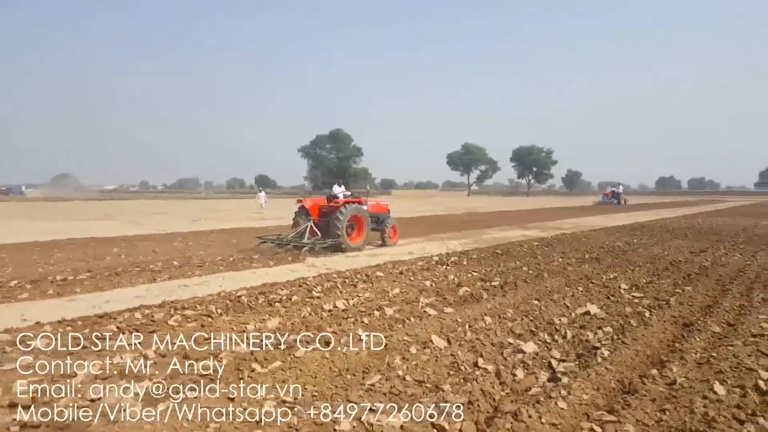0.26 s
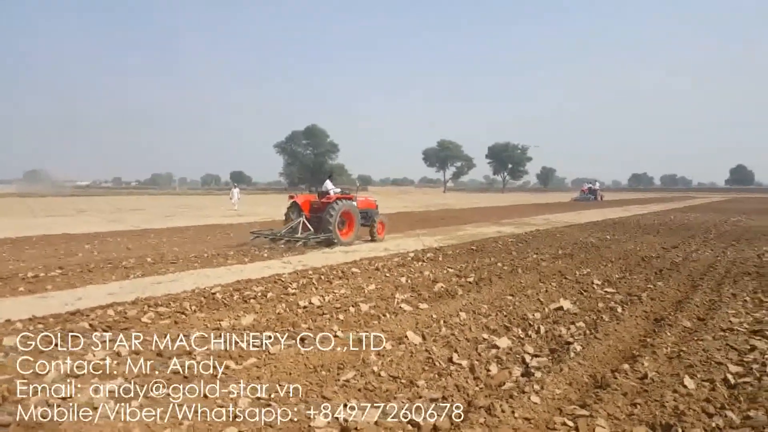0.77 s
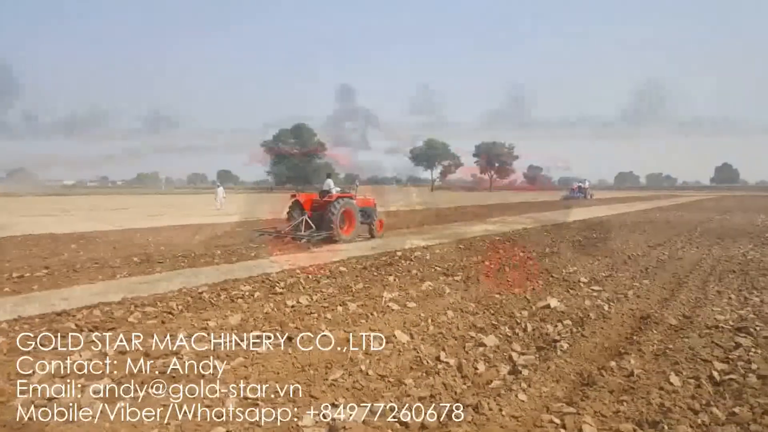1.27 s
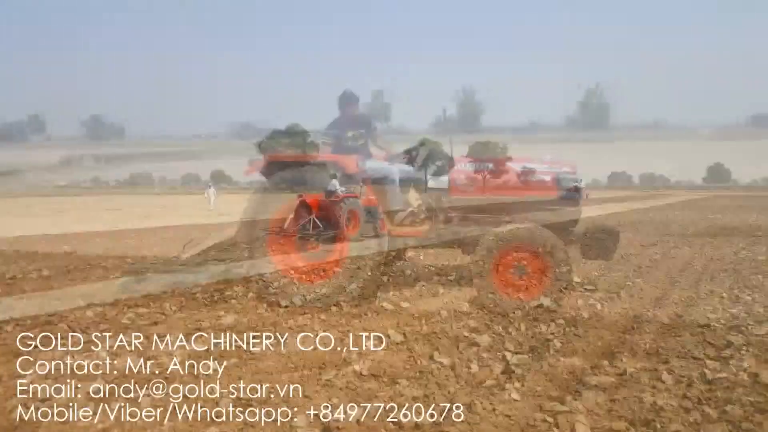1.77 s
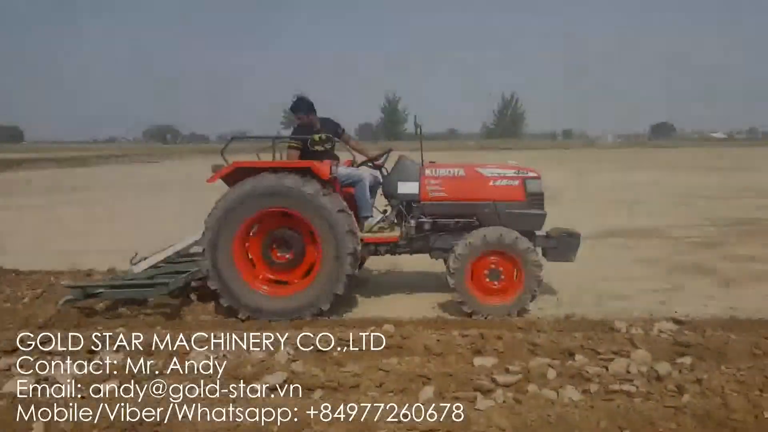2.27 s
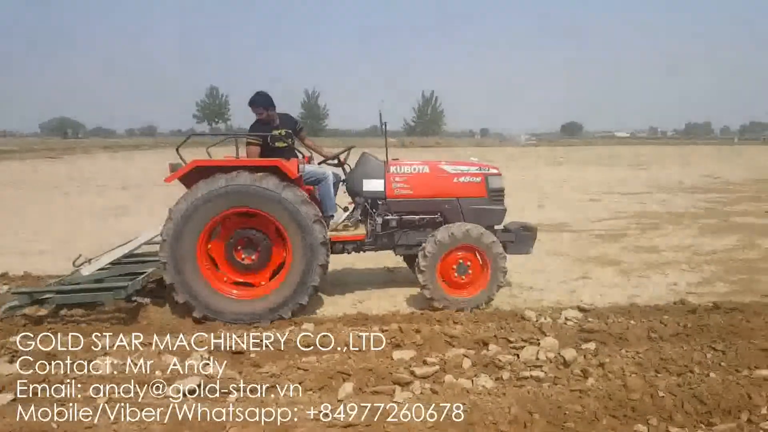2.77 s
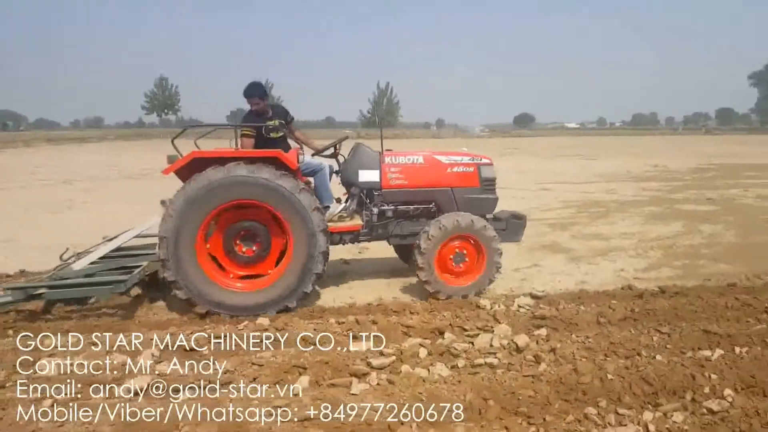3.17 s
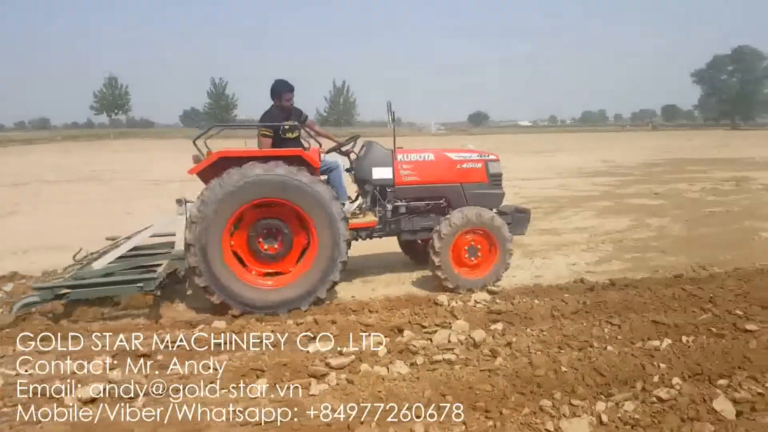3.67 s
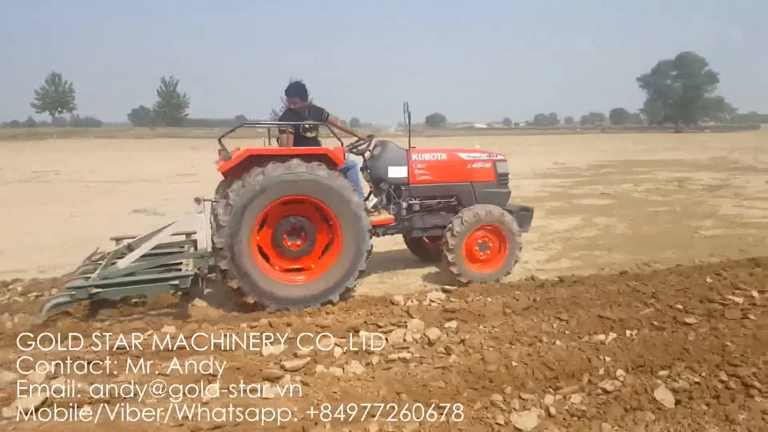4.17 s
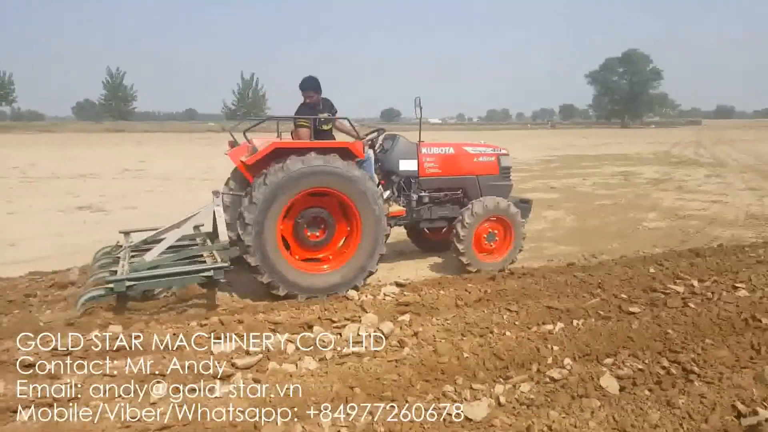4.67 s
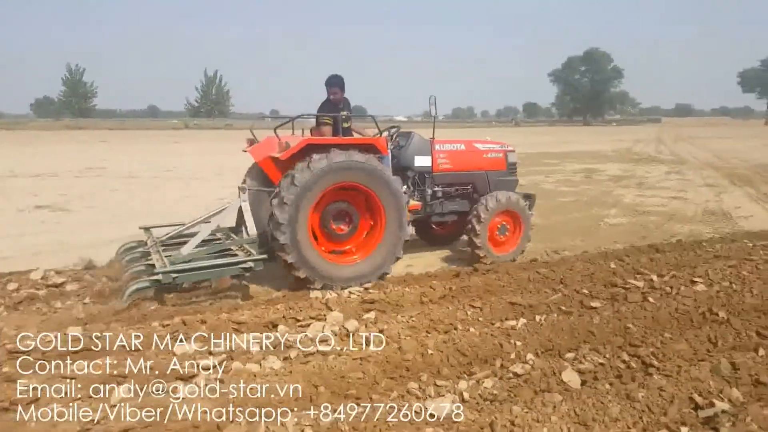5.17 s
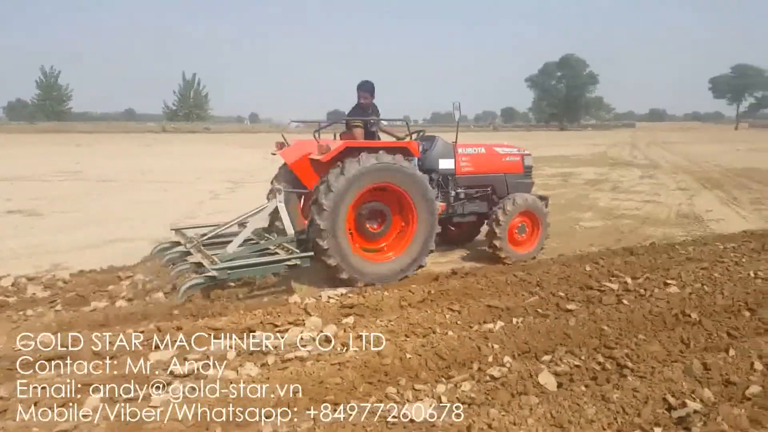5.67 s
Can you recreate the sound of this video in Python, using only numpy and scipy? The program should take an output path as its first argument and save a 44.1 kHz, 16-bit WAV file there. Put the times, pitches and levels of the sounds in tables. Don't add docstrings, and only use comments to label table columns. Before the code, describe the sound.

From 0 to about 0.95 s a four-cylinder tractor diesel is heard across an open field: a quiet, dull, steady drone near 67 firings a second, with faint gear whine and soft clatter. At 0.96 s a close view of the machine cuts in abruptly, far louder, near 61 to 62 firings a second. Both overlap and beat until the far one ends at about 1.95 s. The close engine has a deep buzzing exhaust, uneven chug, rattling panels, sharp knock and bright valve hiss. Gear whines around 600 to 2700 Hz flutter and swell in spells. Steel tines squeak on stones near 4.7 kHz: a tiny chirp at 1.05, a longer skid at 1.2, short ones at 1.5 and 2.55. The engine labours, lowest near 3.1 s with a stronger bark, then recovers by 4 s. As it turns tail-on, upper exhaust tones fade and it continues slightly softer to about 5.9 s. Mono, no high treble.

```python
import sys
import numpy as np
from scipy import signal
from scipy.fft import rfft, irfft, next_fast_len
from scipy.io import wavfile
from scipy.ndimage import uniform_filter1d, map_coordinates

SR = 44100
rng = np.random.default_rng(int(sys.argv[2]) if len(sys.argv) > 2 else 0)


def log_audio(samples):
    frames = np.atleast_2d(samples).T
    limited = np.clip(frames, -1, 1)
    pcm = np.round(limited * 32767).astype(np.int16)
    wavfile.write(sys.argv[1], SR, pcm)


def gain_from_decibels(decibels):
    exponent = np.asarray(decibels, float) / 20
    return 10 ** exponent


N = 261072
T = np.arange(N) / SR
CUT_IN_S, FAR_ENDS_S = .956, 1.955


def unit(x):
    return x / np.sqrt(np.mean(x ** 2) + 1e-20)


def curves(rows):
    s, *cols = np.transpose(rows)
    return [np.interp(T, s, c) for c in cols]


def wobble(rate):
    return map_coordinates(rng.standard_normal(int(N * rate / SR) + 4), [T * rate])


def coloured(x, spectrum):
    m = next_fast_len(N + 8192)
    hz, db = np.transpose(spectrum)
    log_hz = np.log(np.fft.rfftfreq(m, 1 / SR) + 1)
    gain = gain_from_decibels(np.interp(log_hz, np.log(hz), db))
    return unit(irfft(rfft(x, m) * gain, m)[:N])


def patchy(depth_db):
    z = signal.stft(rng.standard_normal(N), nperseg=512)[2]
    field = uniform_filter1d(rng.standard_normal(z.shape), size=5, axis=0)
    field = uniform_filter1d(field, size=10, axis=1)
    return signal.istft(z * gain_from_decibels(depth_db * unit(field)), nperseg=512)[1][:N]


def firings(rate_hz, start_s):
    return np.cumsum(rate_hz * (T >= start_s)) / SR


def exhaust(cycle, orders, levels_db, crank, spread):
    start, lag = crank
    total = 0
    for k, db in zip(orders, levels_db):
        turns = k * (cycle + start) + (k - 1) * (lag + spread * (k - 2))
        total = total + np.sqrt(2) * gain_from_decibels(db) * np.cos(2 * np.pi * turns)
    return total


def chug(cycle, pipe, air):
    at = np.flatnonzero(np.diff(np.floor(cycle)))
    puffs = np.zeros(N)
    puffs[at] = rng.standard_normal(len(at))
    return unit(coloured(puffs, pipe) + air * coloured(rng.standard_normal(N), pipe))


def whine(cycle, order, level_db, flutter_db, slack):
    shake = rng.uniform(0, 2 * np.pi) + slack * np.sqrt(order) * wobble(22)
    level = np.sqrt(2) * gain_from_decibels(level_db + flutter_db * wobble(14))
    return level * np.sin(2 * np.pi * order * cycle + shake)


CYLINDER_STRENGTH = (0.62, 0.59, 0.92, 0.54)


def knocking(cycle, rise, fall, scatter_db):
    count = np.floor(cycle).astype(int)
    since = cycle - count
    chance = gain_from_decibels(scatter_db * rng.standard_normal(count.max() + 1))
    strength = np.array(CYLINDER_STRENGTH)[count % len(CYLINDER_STRENGTH)] * chance[count]
    return strength * (1 - np.exp(-(since / rise) ** 2)) * np.exp(-since / fall)


# multiple of the firing rate, level in dB.
FAR_GEAR_LINES = [(1.45, -40.5), (3, -40.5), (6.07, -42.5), (9.82, -41), (11.38, -43), (12.1, -47),
                  (14.83, -41), (17.04, -49), (19.03, -47), (23.29, -43), (29.6, -42), (31.04, -44.5),
                  (33.04, -52), (37.03, -53), (39.2, -52), (44.45, -43.5), (46.56, -48.5), (54.3, -52),
                  (88.5, -64), (116.5, -66), (132, -70)]


def far_gears(cycle):
    return sum(whine(cycle, order, db, flutter_db=2.0, slack=0.075) for order, db in FAR_GEAR_LINES)


# frequency in Hz, gain in dB.
FIELD_COLOUR = [(150, -42), (260, -12.5), (512, -1), (597, -14.5), (664, -5.5), (1250, -7), (1410, -11.5),
                (1570, -5.5), (1780, -14), (2010, -10.5), (3050, -13), (4910, -27), (7100, -30),
                (9080, -42.5), (10300, -60.5), (13400, -89.5), (22000, -120)]


def far_clatter(cycle):
    rattle = patchy(1.05) * (5.5 + .7 * knocking(cycle, rise=0.093, fall=.3, scatter_db=7.0))
    return coloured(rattle, FIELD_COLOUR)


# time in seconds, rate in Hz.
FAR_RATE = [(0, 67.01), (.24, 67.44), (.6, 67.46), (.84, 66.88), (1.08, 67.5), (1.4, 67.1), (1.56, 66.76),
            (1.7, 66.95), (1.96, 66.9)]
# time in seconds, level in dB.
FAR_NEARNESS = [(0, 0.1), (.28, 0), (.6, 0), (.8, 0), (.96, -0.2), (1.5, -0.5)]
# frequency in Hz, gain in dB.
FAR_PIPE_COLOUR = [(15, -14), (50, -20), (100, 2.5), (150, -5.5), (210, -7), (270, -16), (400, -28),
                   (800, -67)]


def far_pass():
    (rate_hz,), (near_db,) = curves(FAR_RATE), curves(FAR_NEARNESS)
    cycle = firings(rate_hz, 0)
    sound = exhaust(cycle, (1, 2), (near_db - 25, near_db - 27), crank=(-.05, .3), spread=0)
    sound = sound + far_gears(cycle)
    sound += gain_from_decibels(near_db - 32.5 + 4.94) * far_clatter(cycle)
    sound += gain_from_decibels(near_db - 31) * chug(cycle, FAR_PIPE_COLOUR, air=1.8)
    return sound * np.clip((FAR_ENDS_S - T) / 0.0043, 0, 1)


# centre in seconds, half length in seconds, pitch in Hz, level in dB.
TINE_SQUEAKS = [
    (1.047, 0.021, 4720, -48),
    (1.18, 0.073, 4650, -34),
    (1.52, .03, 4930, -39),
    (2.546, .03, 4700, -43.5),
]


def tines():
    total = 0
    for s, half, hz, db in TINE_SQUEAKS:
        level = gain_from_decibels(db + 2.8 * wobble(90)) * np.exp(-((T - s) / half) ** 2)
        total = total + level * np.sin(2 * np.pi * hz * T + 1.3 * wobble(160))
    return total


# frequency in Hz, gain in dB.
HISS_COLOUR = [(2120, -23), (3600, -2.5), (3910, -5), (4720, -2), (5750, -10), (7540, -12), (8400, -19.5),
               (9310, -25), (9900, -33.5), (10300, -42), (10600, -58.5), (22000, -120)]


def valve_hiss(cycle, jolts):
    valves = 1 + .55 * knocking(cycle + .11, rise=.06, fall=.45, scatter_db=3.5)
    return coloured(patchy(0.62) * valves * gain_from_decibels(0.52 * jolts), HISS_COLOUR)


# frequency in Hz, gain in dB.
SIDE_COLOUR = [(150, -20), (260, -5.5), (292, -8), (424, -13.5), (548, -3.5), (601, -6), (683, -6.5),
               (750, -2.5), (1100, -13.5), (1410, -3), (1670, -12.5), (1860, -5.5), (2110, -12),
               (3070, -17), (4200, -26), (5460, -55), (9240, -120)]
# frequency in Hz, gain in dB.
REAR_COLOUR = [(150, -23), (260, 1), (523, -9), (645, -2), (852, -3.5), (914, -3.5), (1060, -16),
               (1410, -5.5), (1710, -11.5), (1880, -8.5), (2110, -17), (2290, -8.5), (2610, -17),
               (3100, -14.5), (4200, -22), (5460, -50), (9240, -120)]


def panel_clatter(behind, jolts):
    block = patchy(1.0) * gain_from_decibels(0.25 * jolts)
    return unit((1 - behind) * coloured(block, SIDE_COLOUR) + behind * coloured(block, REAR_COLOUR))


# frequency in Hz, gain in dB.
KNOCK_COLOUR = [(500, -40.5), (1000, -10.5), (1500, 3), (2200, -8.5), (3500, -7), (5000, -23),
                (8000, -22.5), (10500, -49)]


def combustion_knock(cycle):
    bursts = knocking(cycle + .1, rise=.1, fall=.35, scatter_db=1.5)
    return coloured(rng.standard_normal(N) * bursts, KNOCK_COLOUR)


def singing(rest_db, spells):
    level = gain_from_decibels(rest_db)
    edges = np.array([-1, 1, -1, 1]) * .07
    for s, length, db in spells:
        shape = np.interp(T, s + edges + [0, 0, length, length], [0, 1, 1, 0])
        level = level + max(gain_from_decibels(db) - gain_from_decibels(rest_db), 0) * shape
    return 20 * np.log10(level)


# multiple of the firing rate, resting level in dB.
PUMP_MESHES = [(14.77, -44.5), (22.17, -38), (36.93, -48.5), (44.3, -41.5)]
GEARBOX_MESHES = [(9.77, -48.5), (12.01, -49), (29.45, -41.5)]
AXLE_MESHES = [(23.22, -42), (30.93, -46)]
UPPER_MESHES = [(38.96, -52), (48.85, -48.5), (58.7, -57), (60.7, -54), (6.06, -44)]
# start in seconds, length in seconds, level in dB.
PUMP_SPELLS = [
    [(.9, 0.34, -29.5), (1.3, 0.36, -28.5), (1.9, .8, -33), (2.7, 0.23, -28), (2.9, 0.14, -34),
     (3.3, 1.6, -30.5), (4.9, .4, -36), (5.3, 0.38, -28), (5.83, .2, -27)],
    [(.9, 0.45, -23.5), (1.3, 0.42, -30), (1.9, 0.35, -25.5), (2.3, 0.08, -23.5), (2.5, 0.22, -25.5),
     (2.9, 0.15, -26.5), (3.3, 0.42, -29), (3.9, 0.74, -28), (4.7, 0.32, -33)],
    [(1.1, 0.22, -35), (1.9, 0.18, -39), (3.9, 0.19, -33), (4.3, 0.55, -37), (5.3, 0.17, -33)],
    [(1.4, 0.85, -41), (2.9, 0.22, -37.5), (4.5, 0.36, -37), (5.3, .2, -37)],
]
GEARBOX_SPELLS = [
    [(.9, 0.57, -31), (1.5, 0.42, -28.5), (1.9, .3, -36), (2.58, 0.554, -25), (3.1, 0.41, -26.5),
     (3.5, 0.21, -22.5), (3.7, 0.24, -27.5), (4.9, .4, -36.5), (5.7, .3, -34.5)],
    [(1.1, 0.37, -33), (1.5, 0.37, -28), (2.1, 0.58, -30.5), (3.3, .2, -30.5), (3.6, 0.38, -32),
     (4.3, .2, -39), (5.5, .2, -38)],
    [(1.7, 0.22, -34), (2.2, 1.3, -32), (3.7, 0.17, -40), (5.4, 0.34, -34)],
]
AXLE_SPELLS = [
    [(1, .3, -31), (1.6, 0.29, -29.5), (1.9, 0.18, -26.5), (2.1, 0.51, -29), (3.15, 0.44, -32.5),
     (3.7, 0.13, -28), (3.9, 0.54, -32.5), (4.5, 0.52, -36.5), (5.5, .2, -32)],
    [(1.1, 0.18, -30), (1.55, 1.4, -34.5), (3.5, 0.19, -29), (3.7, 0.24, -31.5), (4.52, 0.41, -31.5),
     (4.9, 0.27, -28), (5.72, .3, -32.5)],
]
UPPER_SPELLS = [
    [(.9, 1.3, -39), (2.2, 1.4, -37)],
    [(.9, 0.73, -39), (1.9, 0.48, -39), (3.3, 0.9, -40.5)],
    [(.9, .6, -42), (1.9, .5, -37.5), (2.4, 1.4, -43)],
    [(2, .7, -45), (2.75, .5, -42.5)],
    [(1.1, 1.45, -37), (3.3, 0.52, -37), (4.4, .65, -33), (5.1, 0.29, -33), (5.55, .45, -37)],
]
# multiple of the firing rate, level in dB.
CRANK_LINES = [(1.25, -36.5), (1.5, -38), (3.49, -39), (2.747, -33.5), (4.79, -39.5), (7.97, -46),
               (12.08, -35.5), (15.47, -40.5), (19.42, -47), (24.13, -37), (39, -49.5)]
# multiple of the firing rate, level in dB.
TAIL_LINES = [(4.25, -35), (5, -34), (7, -37.5), (7.74, -39), (10.24, -37.5)]


def near_gears(cycle, behind):
    total = 0
    trains = ((PUMP_MESHES, PUMP_SPELLS, 1.1, .03), (GEARBOX_MESHES, GEARBOX_SPELLS, 1.1, .03),
              (AXLE_MESHES, AXLE_SPELLS, 1.1, .03), (UPPER_MESHES, UPPER_SPELLS, 1.0, .027))
    for meshes, rows, flutter_db, slack in trains:
        for (order, rest_db), spells in zip(meshes, rows):
            total = total + whine(cycle, order, singing(rest_db, spells), flutter_db, slack)
    for order, db in CRANK_LINES:
        total += whine(cycle, order, db + 2.7 * wobble(1.47), flutter_db=2.5, slack=.08)
    for order, db in TAIL_LINES:
        level_db = db - 11 * (1 - behind) ** 0.81 + 1.4 * wobble(1.2)
        total += whine(cycle, order, level_db, flutter_db=2.0, slack=.09)
    return total


def leaving(rows, echoes):
    levels_db = []
    for (db, held, slope, ends), echo in zip(rows, echoes):
        level_db = db + slope * (np.clip(T, held, ends) - held)
        for s, change_db in echo:
            level_db = level_db + change_db * np.exp(-((T - s) / 0.16) ** 2)
        levels_db.append(level_db)
    return levels_db


# level in dB, held until in seconds, then slope in dB per second, fade end in seconds.
ORDER_FADES = [
    (-17, 2.24, -1.6, 3.9),
    (-22.5, 4.5, -6.5, 7),
    (-25.5, 3.8, -9, 5.3),
]
# time in seconds, change in dB.
ORDER_ECHOES = [
    [],
    [(1.25, -2.2), (2.5, 5), (2.73, -4), (3.1, -0.5), (3.6, -7.5), (3.95, 1.5), (4.35, -9.5), (5.46, -1)],
    [(1, -2), (1.6, 2), (2.2, -3.5), (3.14, -2.5), (4.04, -4)],
]
QUARTER_ORDERS = (1.75, 2.25, 3.25, 3.75)
# level in dB, held until in seconds, slope in dB per second, fade end in seconds.
QUARTER_FADES = [
    (-34, 7, 1, 5.9),
    (-25.5, 2.3, -6.5, 5.6),
    (-32, 4, -1.5, 5.9),
    (-34, 4, -5, 5.9),
]
# time in seconds, change in dB.
QUARTER_ECHOES = [
    [(3, -8.5), (4.6, 9)],
    [(1, -4.5), (5.5, -14)],
    [(1.75, -11), (2.38, 7), (4, 6.5)],
    [(3.62, 3.5)],
]


def near_exhaust(cycle, rate_hz, shade_db, behind):
    bark_db = -17.5 + 2.5 * (62.3 - rate_hz) + shade_db
    first_db, *upper_db = leaving(ORDER_FADES, ORDER_ECHOES)
    spread = -.13 + .22 * behind
    even = exhaust(cycle, (1, 2, 3, 4), (first_db, bark_db, *upper_db), (3.37, .02), spread)
    quarter_db = leaving(QUARTER_FADES, QUARTER_ECHOES)
    return even + exhaust(cycle, QUARTER_ORDERS, quarter_db, (3.37, .12), spread)


# time in seconds, rate in Hz.
NEAR_RATE = [(.956, 61.49), (1.21, 61.56), (1.46, 62.11), (1.71, 61.76), (1.9, 61.68), (2.1, 61.2),
             (2.33, 61.22), (2.55, 60.75), (2.71, 60.2), (3.12, 59.79), (3.37, 60.67), (3.6, 60.76),
             (4.05, 62.05), (4.21, 62.18), (4.83, 62.46), (5.25, 62.33), (5.55, 61.8), (5.92, 62.1)]
# time in seconds, level in dB.
NEAR_NEARNESS = [(.96, -18), (1.18, -16.5), (1.26, -18.5), (2.85, -16), (3.27, -17.5), (3.54, -17),
                 (4.08, -18), (5.64, -19), (5.92, -19)]
# time in seconds, shade in dB.
BONNET_SHADE = [(.96, -2), (1.75, -10.5), (2.25, -8.5), (3.05, -1), (3.45, -1), (4.6, 1.5), (5.2, -1.1),
                (5.6, -0.1)]
# time in seconds, share seen from behind 0 to 1.
TURN = [(.96, 0.31), (2.6, 0.56), (3.6, 0.76), (4.3, 0.59), (5.92, 1)]
# frequency in Hz, gain in dB.
NEAR_PIPE_COLOUR = [(15, -14.5), (35, -16), (55, -15), (80, -8.5), (110, 8), (140, 3), (200, 5),
                    (250, -14.5), (330, -5.5), (500, -32), (900, -64)]


def near_pass():
    (rate_hz,), (near_db,), (shade_db,) = curves(NEAR_RATE), curves(NEAR_NEARNESS), curves(BONNET_SHADE)
    behind = np.clip(curves(TURN)[0], 0, 1)
    cycle = firings(rate_hz, CUT_IN_S)
    jolts = wobble(11)
    sound = tines() + gain_from_decibels(near_db - 14.5) * valve_hiss(cycle, jolts)
    sound += gain_from_decibels(near_db - 2.5) * panel_clatter(behind, jolts)
    sound += gain_from_decibels(near_db - 12.5) * combustion_knock(cycle)
    sound += near_gears(cycle, behind)
    sound += gain_from_decibels(near_db - 6 + 0.39 * shade_db) * chug(cycle, NEAR_PIPE_COLOUR, air=1.0)
    sound += near_exhaust(cycle, rate_hz, shade_db, behind)
    return sound * np.clip((T - CUT_IN_S) / .002, 0, 1)


def scene():
    return (far_pass() + near_pass())[None]


def low_pass(x):
    return signal.sosfilt(signal.butter(12, 10620, fs=SR, output="sos"), x)


def record(dry):
    soft = dry / (1 + np.abs(dry / 1.02) ** 8) ** (1 / 8)
    return low_pass(soft - .0017)


dry = scene()
out = record(dry)
log_audio(out)
```